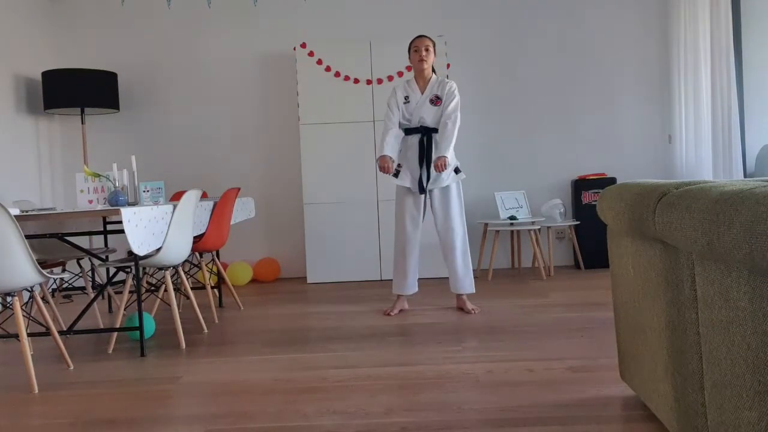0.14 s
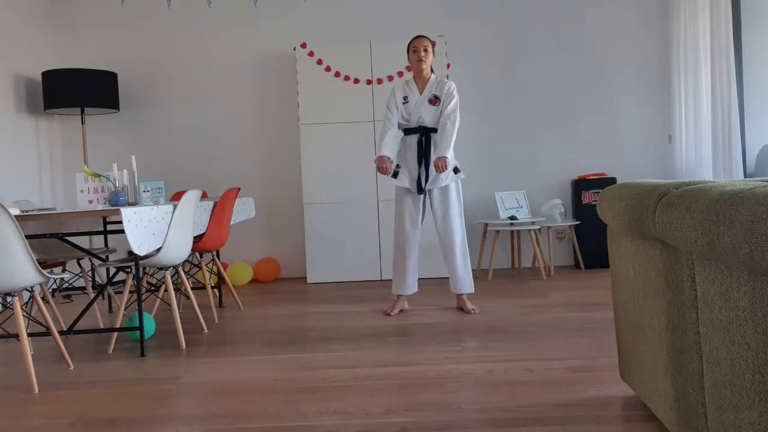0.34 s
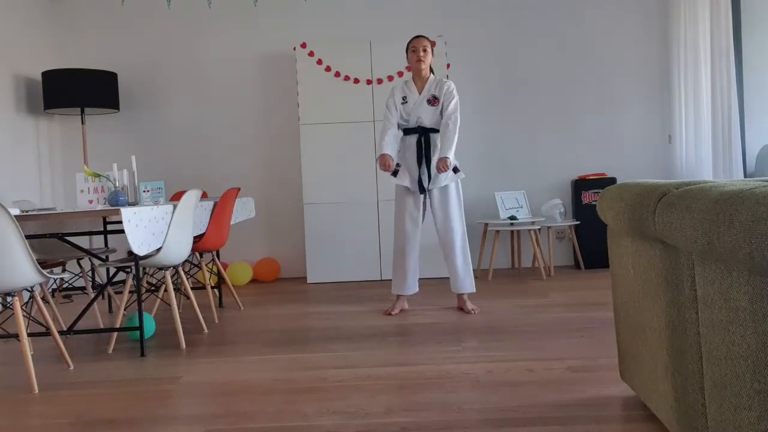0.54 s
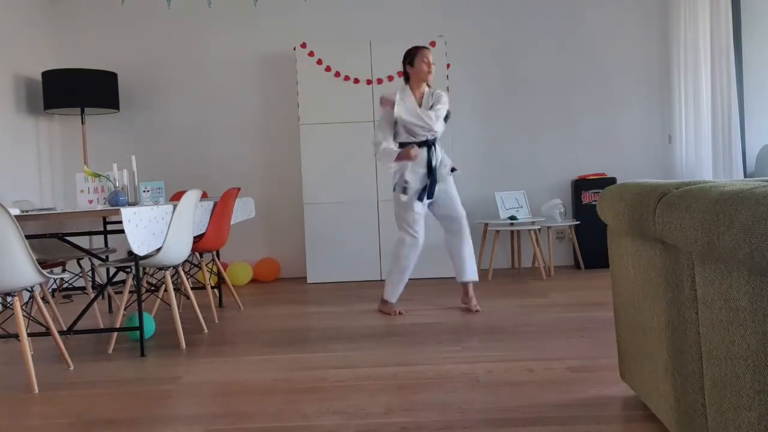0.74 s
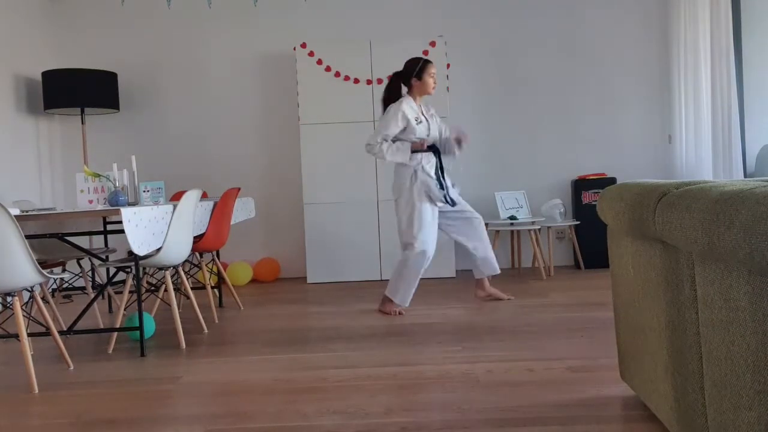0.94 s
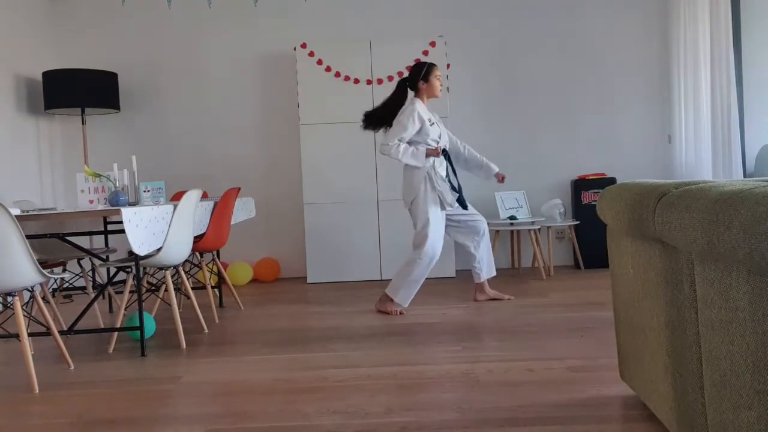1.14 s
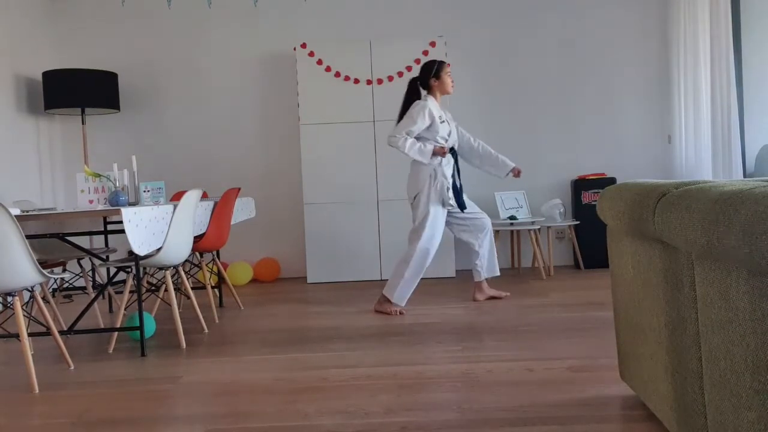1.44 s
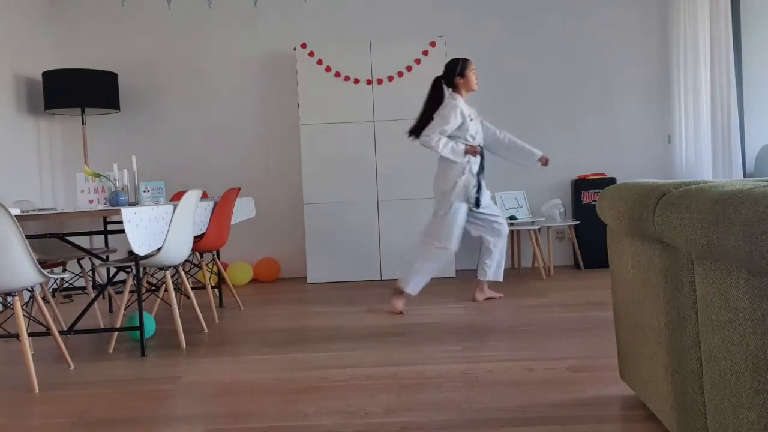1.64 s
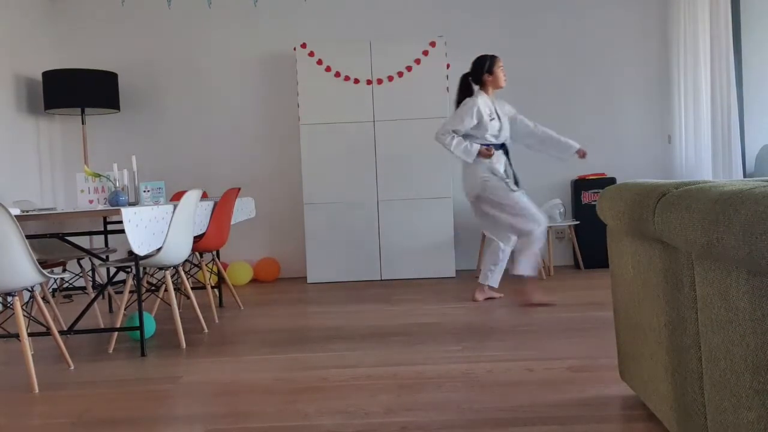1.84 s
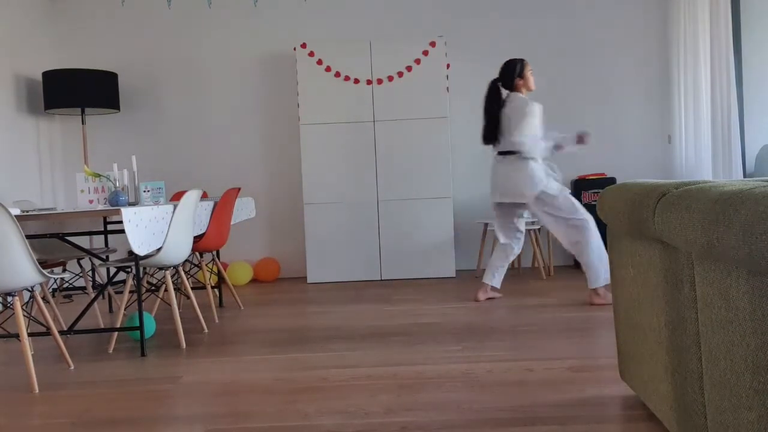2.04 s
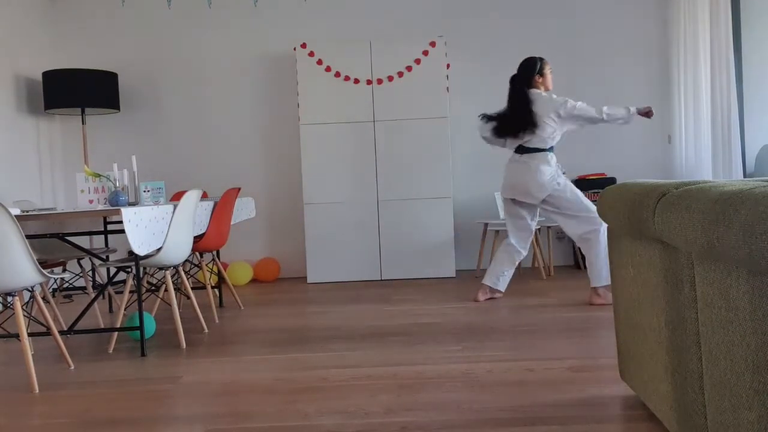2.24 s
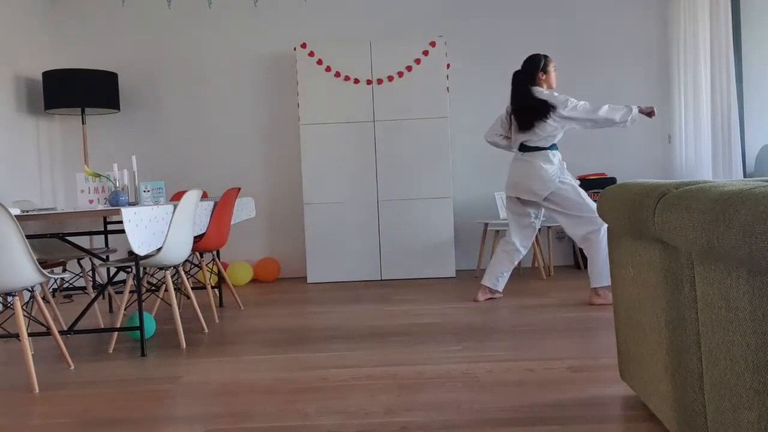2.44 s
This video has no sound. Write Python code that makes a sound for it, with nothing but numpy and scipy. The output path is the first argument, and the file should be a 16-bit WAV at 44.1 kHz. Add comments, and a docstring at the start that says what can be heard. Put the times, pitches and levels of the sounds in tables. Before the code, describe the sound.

Martial arts uniform rustles and snaps as a barefoot person steps and punches in a living room

```python
"""Stiff cotton uniform rubs and flaps as a barefoot person turns, steps and punches, some metres away.
Cloth: dense fibre clicks; flaps: fluttering bands of air noise. Soles slide on the laminate boards
(stick-slip clicks into resonators) and peel off or pat them (struck, decaying modes).
Landing weight rings the floor's low tones. Living room: diffuse noise tail.
An appliance hums (wavering sines) over room rumble (shaped noise)."""
import sys
import numpy as np
from scipy import signal
from scipy.fft import rfft, irfft
from scipy.io import wavfile

SR = 44100
rng = np.random.default_rng(int(sys.argv[2]) if len(sys.argv) > 2 else 0)


def digitize_waveform(pressure):
    """Quantize a signal to 16-bit integers and store it at the path in sys.argv[1].

    Rows of a 2-D input are taken as channels; values are limited to [-1, 1].
    """
    field = np.atleast_2d(pressure).T
    bounded = np.clip(field, -1, 1)
    quanta = np.round(bounded * 32767).astype(np.int16)
    wavfile.write(sys.argv[1], SR, quanta)


def magnitude_from_level(level_db):
    """Linear magnitude for a level in decibels (20 dB per decade)."""
    exponent = np.asarray(level_db, float) / 20
    return 10 ** exponent


N = 115101  # samples

# appliance hum lines: f/Hz, mean level/dB rms
HUM_LINES = [(49, -56.5), (90, -57), (283, -58)]
HUM_WAVER_DB, HUM_WAVER_RATE_HZ, HUM_SWELL_DB_PER_S = 0.5, 5.3, 1.34
# rumble and hiss spectrum: f/Hz, relative density/dB
RUMBLE_SPECTRUM = [(24, -34), (34, -8.5), (45, -6.5), (70, 0.5), (98, -7.5), (118, -17), (150, -8.5),
                   (250, -18.5), (400, -17), (520, -30.5), (700, -30.5), (970, -43.5), (2000, -47),
                   (4500, -51.5), (7500, -60.5), (12500, -56), (15500, -58)]
RUMBLE_RMS_DB = -56.5

# cloth rubbing on cloth: t/s, level at zero tilt/dB, tilt/dB (up for bright half, down for dull half)
RUB_COURSE = [(.6, -87, -1), (.68, -68, 4.5), (0.721, -51.5, 0), (.79, -52.5, -3), (.83, -47.5, 0.8),
              (.88, -48.5, 0), (.96, -53.5, -2.5), (1.0, -55.5, -2.5), (1.03, -51, -0.5), (1.06, -55, -3),
              (1.12, -53, -3), (1.25, -62.5, -4), (1.37, -73.5, -4), (1.45, -69.5, -1), (1.62, -66, -3),
              (1.66, -58, 0.5), (1.73, -54, -3), (1.761, -45.5, 3), (1.853, -43, 4), (1.932, -50, -2),
              (1.962, -47, 5.5), (2.0, -48.5, 6.5), (2.08, -46.5, 1), (2.17, -47.5, -0.9), (2.2, -44, -3),
              (2.25, -42, 0.5), (2.331, -50, -3), (2.449, -62, -4.5), (2.61, -72.5, -2.5)]
# colour of the rub: f/Hz, relative level/dB
CLOTH_SPECTRUM = [(250, -5), (380, -7), (700, -7), (1000, -10.5), (2800, -8), (5000, -15), (5700, -23),
                  (8500, -26.5), (12600, -28), (14300, -32.5), (15700, -44)]
FIBRES_PER_S, FIBRE_SPREAD_DB = 11000, 2.4
TREBLE_PIVOT_HZ = 3000

# soles sliding on the boards: start/s, length/s, peak level/dB, main ring at start f/Hz, at end f/Hz
SOLE_SLIDES = [(0.661, 0.062, -70, 2530, 2900), (0.696, 0.0516, -57, 2290, 2500),
               (0.828, 0.068, -51.5, 2448, 2470), (1.02, 0.05, -57, 4190, 4100),
               (1.09, 0.084, -58, 2275, 2660), (1.645, 0.079, -60, 2525, 2600),
               (1.746, 0.062, -41.5, 2357, 2750), (1.785, 0.045, -45, 1994, 2200),
               (1.806, 0.043, -44, 2567, 2700), (1.926, 0.11, -51.5, 2350, 2850)]
# board surface resonances: ratio to main ring, half-width per pass/Hz, relative gain/dB
SURFACE_PEAKS = [(.68, 218, -2), (.82, 217, -1), (1, 126, 15), (1.4, 545, -4.5), (1.8, 463, -13)]
SLIPS_PER_S, SLIP_SPREAD_DB = 7000, 2.0

# loose cloth flapping through the air: start/s, length/s, peak level before flutter/dB, centre f/Hz
CLOTH_FLAPS = [(0.694, 0.16, -59, 484), (0.798, 0.084, -51, 453), (1.106, 0.16, -61, 680),
               (1.297, 0.15, -68.5, 560), (1.76, 0.13, -53.5, 504), (2.057, 0.14, -57, 435),
               (2.158, 0.056, -51, 900), (2.19, 0.1, -41, 610), (2.203, 0.1, -48.5, 187),
               (2.244, 0.13, -46, 527), (2.314, 0.26, -59.5, 830)]
FLUTTER_DB, FLUTTER_RATE_HZ = 1.5, 60
FLAP_WIDTH_RATIO = 1.15  # width of each filter pass / centre
FLAP_RISE_SHARE, SLIDE_RISE_SHARE = .35, .18  # of stroke length

# toes and ball of the foot peeling off or patting: t/s, level before modes and softening/dB, ring f/Hz
FOOT_PATS = [(0.699, -49, 349), (0.808, -46.5, 375), (1.728, -39, 400), (1.74, -33.5, 414.5),
             (1.752, -34.5, 431), (1.797, -44.5, 330), (1.818, -37.5, 371), (1.854, -39.5, 453),
             (2.088, -48, 437)]
# modes of a board: ratio to ring, relative level/dB, t60/s
BOARD_MODES = [(.68, -2, 0.047), (1.002, 0, 0.11), (1.25, -15, 0.071), (1.6, -11.5, 0.078)]
PAT_SOFT_HZ = 900

# weight landing on the floor: t/s, level before modes and rise/dB, floor tone f/Hz, reference t60/s
LANDINGS = [(0.801, -45.5, 65.1, 1.9), (0.928, -41, 64.7, 0.29), (1.005, -41, 76, 0.22),
            (1.096, -47, 71, 1.17), (1.619, -41, 72.3, 0.36), (1.751, -49.5, 69.2, 2.6),
            (2.078, -26, 75.3, 0.34), (2.151, -36, 67.7, 0.5), (2.253, -43.5, 74.3, 0.49),
            (2.532, -50, 54.8, 1.2)]
# modes of the joisted floor: ratio to floor tone, relative level/dB, share of reference t60
FLOOR_MODES = [(.7, -13, 1), (0.999, 5.5, 0.53), (1.501, -10, 0.96), (1.899, -6.5, 0.68), (2.6, -4, 0.19)]
THUD_RISE_S, THUD_SPREAD_DB = .009, 1.0
FLOOR_SIDE_DB = -24  # side part relative to the floor's boom

# room decay: f/Hz, t60/s
ROOM_DECAY = [(200, 0.55), (2000, 0.22), (6000, 0.26), (14000, 0.35)]
ROOM_DB, ROOM_GAP_S = -7.5, 0.011

# left-right correlation of spread noise: f/Hz, correlation
SIDE_LIKENESS = [(60, 0.95), (130, 0.88), (290, 0.81), (640, 0.52), (3100, 0.1), (6820, 0.027),
                 (15000, -0.15)]
# balance: f/Hz, left minus right/dB
SIDE_BALANCE = [(60, 1), (380, -1), (950, 0.5), (2380, 0.0), (5980, -6), (15000, -3.5)]
# extra treble balance over time: t/s, left minus right/dB
TREBLE_LEAN = [(.6, 2), (.72, 0.5), (.9, 0.5), (1.5, -3), (1.8, 2.5), (2.3, -1.3)]


def rms_one(x):
    """Scales x to rms 1."""
    return x / np.sqrt(np.mean(x ** 2) + 1e-20)


def bin_hz(size):
    """Bin frequencies in Hz, held at 1 or above for the log axis."""
    return np.maximum(np.fft.rfftfreq(size, 1 / SR), 1)


def at_hz(points, hz):
    """Reads a table on a log frequency axis."""
    table_hz, value = np.transpose(points)
    return np.interp(np.log(hz), np.log(table_hz), value)


def colour(x, spectrum):
    """Filters x by the spectrum; rms 1."""
    size = x.shape[-1]
    gain = magnitude_from_level(at_hz(spectrum, bin_hz(size)))
    return rms_one(irfft(rfft(x) * gain, size))


def drift(rate_hz):
    """Two-pole low-passed noise, rms 1; the settling second is dropped."""
    r = np.exp(-2 * np.pi * rate_hz / SR)
    noise = rng.standard_normal(N + SR)
    return rms_one(signal.lfilter([1], [1, -2 * r, r * r], noise)[SR:])


def grains(per_s, spread_db):
    """Random clicks of either sign, sizes exponential in dB."""
    chance, sign, size = rng.random((3, N))
    level_db = -spread_db * np.log(size + .015)
    return (chance < per_s / SR) * np.sign(sign - .5) * magnitude_from_level(level_db)


def resonate(x, hz, width_hz):
    """Two-pole resonator, unit gain near its centre."""
    r, w = np.exp(-np.pi * width_hz / SR), 2 * np.pi * hz / SR
    return signal.lfilter([(1 - r * r) / 2, 0, (r * r - 1) / 2], [1, -2 * r * np.cos(w), r * r], x)


def resonate_twice(x, hz, width_hz):
    """Two equal resonators in series steepen the skirts."""
    return resonate(resonate(x, hz, width_hz), hz, width_hz)


def stroke(start, length, db, rise_share):
    """A stroke swells quickly and fades more slowly."""
    knots_s = [start, start + rise_share * length, start + length]
    shape = np.interp(np.arange(N) / SR, knots_s, [0, 1, 0])
    return magnitude_from_level(db) * np.sin(shape * np.pi / 2)


def treble_split(pair):
    """First-order split at the pivot: dull and bright halves sum to the input."""
    dull = signal.sosfilt(signal.butter(1, TREBLE_PIVOT_HZ, fs=SR, output="sos"), pair)
    return dull, pair - dull


def spread(pair):
    """Mid/side mix of unrelated signals: alike in the bass, apart in the treble."""
    size = pair.shape[-1]
    alike = np.clip(at_hz(SIDE_LIKENESS, bin_hz(size)), -.99, .99)
    mid, side = rfft(pair) * np.sqrt([(1 + alike) / 2, (1 - alike) / 2])
    return irfft(np.array([mid + side, mid - side]), size)


def background():
    """Central hum lines waver and slowly swell over wide rumble and hiss."""
    t = np.arange(N) / SR
    hum = np.zeros(N)
    for hz, db in HUM_LINES:
        waver_db = HUM_WAVER_DB * drift(HUM_WAVER_RATE_HZ)
        level_db = db + HUM_SWELL_DB_PER_S * (t - t.mean()) + waver_db
        hum += np.sqrt(2) * magnitude_from_level(level_db) * np.sin(2 * np.pi * (hz * t + rng.random()))
    rumble = spread(colour(rng.standard_normal((2, N)), RUMBLE_SPECTRUM))
    return hum + magnitude_from_level(RUMBLE_RMS_DB) * rumble


def cloth():
    """Fibres catch and release as dense clicks; level and tilt follow the rub."""
    times_s, *courses = np.transpose(RUB_COURSE)
    db, tilt_db = [np.interp(np.arange(N) / SR, times_s, course) for course in courses]
    rub = np.array([colour(grains(FIBRES_PER_S, FIBRE_SPREAD_DB), CLOTH_SPECTRUM) for _ in "lr"])
    dull, bright = treble_split(rub)
    return magnitude_from_level(db) * (magnitude_from_level(-tilt_db) * dull + magnitude_from_level(tilt_db) * bright)


def slides():
    """Skin stick-slip rings the boards' surface; the ring glides as the sole presses down."""
    slips = np.array([grains(SLIPS_PER_S, SLIP_SPREAD_DB) for _ in "lr"])
    out = np.zeros((2, N))
    lead = 500  # samples for the resonators to settle
    for start, length, level_db, hz, end_hz in SOLE_SLIDES:
        first, size = int(start * SR), int(length * SR) + 1
        span = slice(first, first + size)
        skin = slips[:, first - lead:first + 2 * size]
        rung = np.zeros(skin.shape)
        for k, (ratio, half_width_hz, db) in enumerate(SURFACE_PEAKS):
            rung += (-1) ** k * magnitude_from_level(db) * resonate_twice(skin, ratio * hz, 2 * half_width_hz)
        # changing read speed glides every resonance together
        read = lead + np.cumsum(np.linspace(1, end_hz / hz, size))
        glide = np.array([np.interp(read, np.arange(len(side)), side) for side in rung])
        out[:, span] += stroke(start, length, level_db, SLIDE_RISE_SHARE)[span] * rms_one(glide)
    return out


def flaps():
    """Loose cloth moves air: fluttering noise, each flap around its own centre."""
    air, out = rng.standard_normal((2, N)), np.zeros((2, N))
    for start, length, db, hz in CLOTH_FLAPS:
        # 2000 samples for the resonators to settle
        span = slice(int(start * SR) - 2000, int((start + length) * SR) + 1)
        band = resonate_twice(air[:, span], hz, FLAP_WIDTH_RATIO * hz)
        out[:, span] += stroke(start, length, db, FLAP_RISE_SHARE)[span] * rms_one(band)
    return out * magnitude_from_level(FLUTTER_DB * drift(FLUTTER_RATE_HZ))


def pats(spread_db=3.0):
    """Soft blows ring every mode of the spot they hit, each with its own strength."""
    chance = rng.standard_normal((len(FOOT_PATS), len(BOARD_MODES)))
    out = np.zeros(N)
    for (start, db, hz), luck in zip(FOOT_PATS, chance):
        t = np.maximum(np.arange(N) / SR - start, 0)
        for k, (ratio, mode_db, t60) in enumerate(BOARD_MODES):
            level_db = db + mode_db + spread_db * luck[k] - 60 * t / t60
            out += (-1) ** k * magnitude_from_level(level_db) * np.sin(2 * np.pi * ratio * hz * t)
    soft = np.exp(-2 * np.pi * PAT_SOFT_HZ / SR)
    return signal.lfilter([(1 - soft) ** 2], [1, -2 * soft, soft * soft], out)


def room(pair):
    """Diffuse tail: noise bands decay octave by octave after a short gap."""
    t, tail, white = np.arange(SR) / SR, 0, rng.standard_normal((2, SR))
    for low_hz in 62.5 * 2. ** np.arange(8):
        octave = signal.butter(2, [low_hz, 2 * low_hz], "band", fs=SR, output="sos")
        band = signal.sosfilt(octave, white)
        t60 = at_hz(ROOM_DECAY, low_hz * np.sqrt(2))
        tail = tail + band * magnitude_from_level(-60 * t / t60) / np.sqrt(t60)
    tail = tail * (t > ROOM_GAP_S)
    tail = tail / np.sqrt(np.sum(tail ** 2, axis=1, keepdims=True))  # unit energy
    return signal.fftconvolve(pair, tail, axes=1)[:, :N]


def placed(pair):
    """Left and right differ in colour; the treble leans from side to side as the body moves."""
    half_db = at_hz(SIDE_BALANCE, bin_hz(N)) / 2
    sides = irfft(rfft(pair) * magnitude_from_level([half_db, -half_db]), N)
    dull, bright = treble_split(sides)
    lean_db = np.interp(np.arange(N) / SR, *np.transpose(TREBLE_LEAN)) / 2
    return dull + bright * magnitude_from_level([lean_db, -lean_db])


def thuds():
    """Each landing sets the floor's low tones ringing after a soft rise."""
    out, chance = np.zeros(N), rng.standard_normal((len(LANDINGS), len(FLOOR_MODES)))
    for (start, db, hz, t60), luck in zip(LANDINGS, chance):
        t = np.maximum(np.arange(N) / SR - start, 0)
        rise = (1 - np.exp(-t / THUD_RISE_S)) ** 2
        for (ratio, mode_db, share), own in zip(FLOOR_MODES, luck):
            level_db = db + mode_db + THUD_SPREAD_DB * own - 60 * t / (t60 * share)
            out += magnitude_from_level(level_db) * rise * np.sin(2 * np.pi * ratio * hz * t)
    return out


def scene():
    """Cloth, slides and pats feed the room; pats and boom also arrive directly, near the centre."""
    pat, boom = pats(), thuds()
    moves = cloth() + flaps() + slides()
    heard = placed(spread(moves + magnitude_from_level(ROOM_DB) * room(moves + pat)))
    quarter_turn = np.imag(signal.hilbert(boom))  # phase shifted by 90 degrees
    boom_side = magnitude_from_level(FLOOR_SIDE_DB) * quarter_turn * [[1], [-1]]
    return heard + pat + boom + boom_side + background()


def top_cut(x):
    """Nothing passes above the cut-off."""
    return signal.sosfilt(signal.butter(12, 15680, fs=SR, output="sos"), x)


def record(dry):
    """Returns the finished mix as stored."""
    return top_cut(dry)


dry = scene()
out = record(dry)
digitize_waveform(out)
```